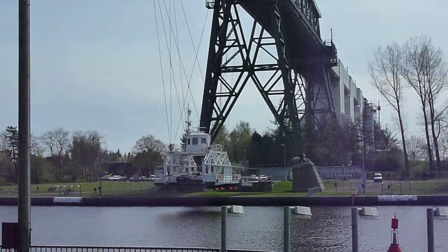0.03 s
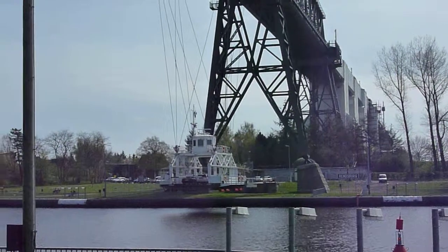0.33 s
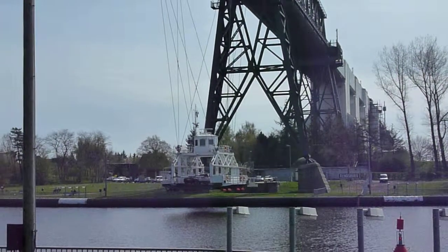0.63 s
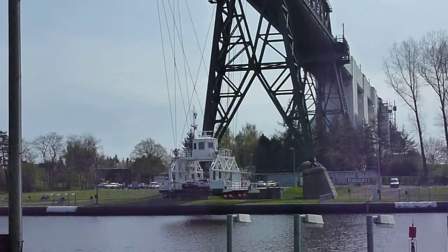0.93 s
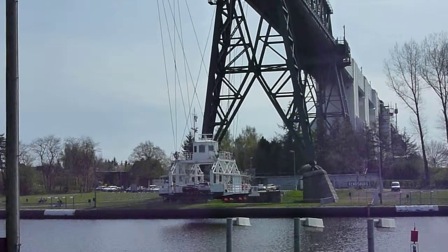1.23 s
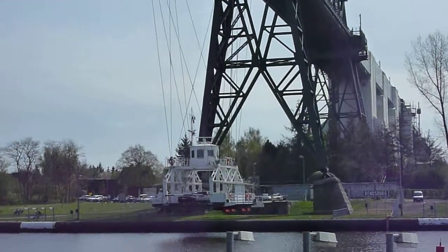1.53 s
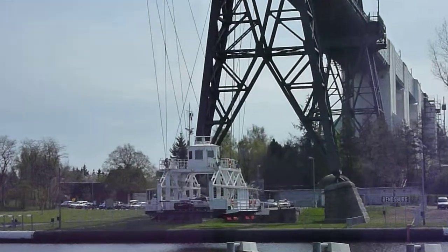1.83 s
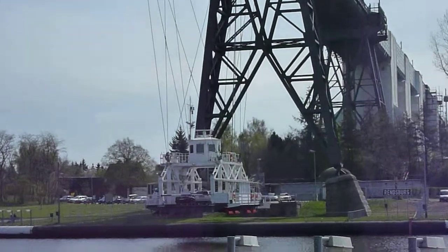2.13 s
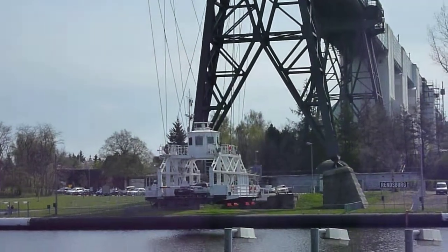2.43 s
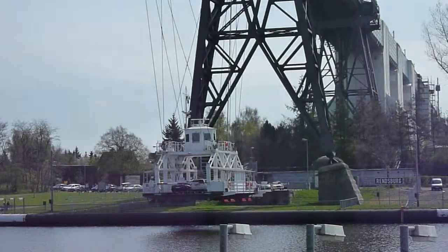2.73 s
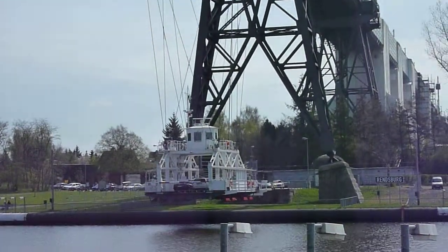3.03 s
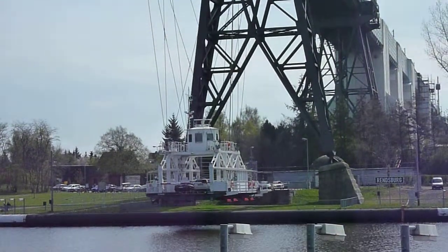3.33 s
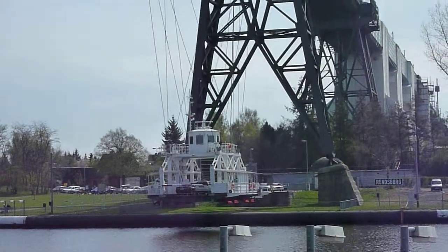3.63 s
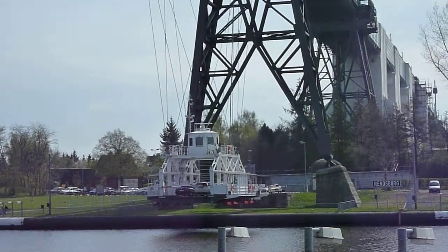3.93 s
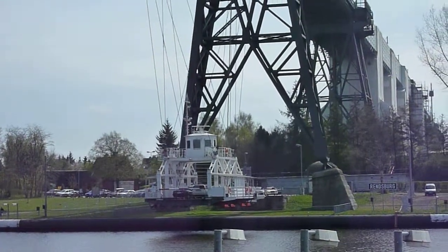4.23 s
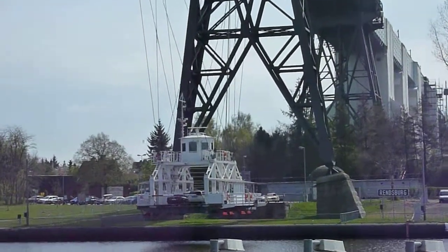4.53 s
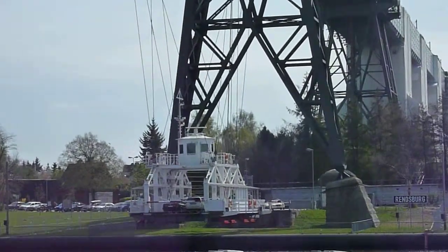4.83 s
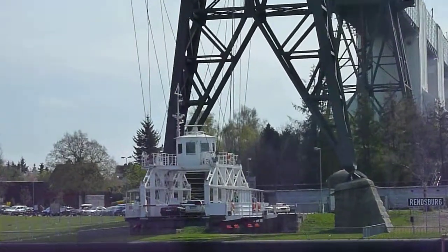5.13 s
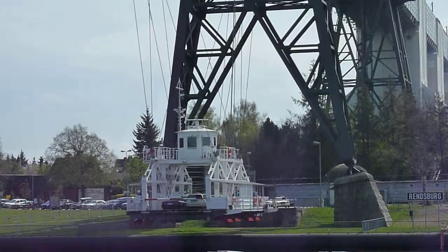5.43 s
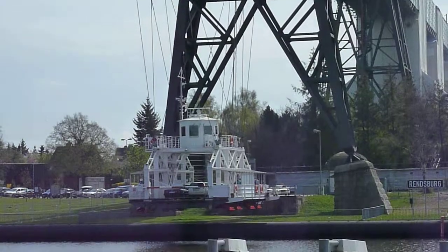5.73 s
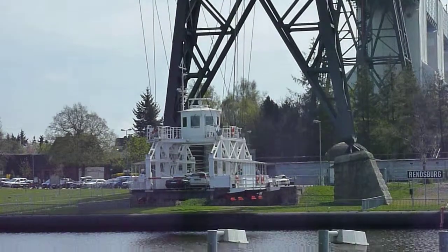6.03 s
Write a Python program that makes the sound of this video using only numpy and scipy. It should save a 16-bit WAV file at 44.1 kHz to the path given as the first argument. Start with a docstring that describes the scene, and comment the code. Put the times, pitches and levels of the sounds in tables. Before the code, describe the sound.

A pile driver strikes steel across a canal, heard from a distance in the open air. Eight clangs fall evenly, about 0.73 seconds apart, from 0.4 to 5.6 seconds, loudest around the middle. Each has a mid-pitched, wavering metallic ring and a clatter of echoes that fades towards the next blow. A low, steady hum of far traffic lies underneath. Wind rumbles on the microphone, lightly at first, with more frequent puffs from about 2.4 seconds and the strongest buffeting between 5 and 6 seconds. The hand-held camera makes a few tiny, close clicks in the first second, then sharper ones at about 1.7 and 4.8 seconds. A bird gives a single faint, thin peep at about 1.1 seconds. From about 3.6 seconds the camera's zoom motor adds a quiet, high hiss, mostly on the left, lasting until the end at about 6 seconds.

```python
"""Steel clangs ring out over a low rumble, one every 0.73 s: a pile driver across a canal.
Each hammer blow makes the steel pile ring, and echoes from banks and buildings smear it.
Wind buffets the microphone and grows stronger towards the end, over a hum of far traffic.
Close by, a hand-held camera clicks a few times and its zoom motor starts to hiss. A bird peeps once."""
import sys
import numpy as np
from scipy import signal
from scipy.fft import rfft, irfft
from scipy.io import wavfile
from scipy.ndimage import uniform_filter1d

SR = 44100
rng = np.random.default_rng(int(sys.argv[2]) if len(sys.argv) > 2 else 0)


def materialize(psi):
    """Save the field psi as 16-bit PCM at rate SR to the path in sys.argv[1].

    A 1-D psi becomes a single channel; in a 2-D psi each row is a channel.
    """
    bounded = np.clip(np.atleast_2d(psi).T, -1, 1)
    quanta = np.round(bounded * 32767).astype(np.int16)
    wavfile.write(sys.argv[1], SR, quanta)


N = 268128
TIME = np.arange(N) / SR

# how much louder the blows are on the left: pitch_hz, left_minus_right_db
BLOW_PAN = [(400, 2.8), (900, 1.3), (1600, 4.4), (2750, 6.7), (5000, 9.2)]


def pile_driver(clatter_db=-14.0, ring_db=-23.5, fresh_db=-10, phase_wobble=0.2, strength_spread_db=2.0):
    """A hammer strikes steel. Every blow takes the same echo paths, so only a little is new each time."""
    # hammer blows: start_s, level_db
    blows = [(0.424, -5.5), (1.153, -4), (1.882, -3), (2.614, -1.15), (3.352, -0.9), (4.081, -1.7),
             (4.823, -3), (5.563, -3)]
    # tones of the steel pile: pitch_hz, relative_db, fade_s (time to fall by 60 dB)
    tones = [(309, -4.5, .9), (401, -7.5, 1.4), (449, -1, .7), (484, -5.5, .7), (534, -1, .7),
             (594, -2, .7), (831, -5, .55), (886, 0, .6), (935, 2, .6), (974, -6, .55), (1006, -2.5, .55),
             (1034, -2.5, .55), (1093, -1, .6), (1116, -4, .6), (1184, -8, .65), (1220, -6, .7),
             (1307, -6, .7), (1386, -3, .72), (1444, -7.5, .65), (1697, -9.5, .55), (1733, -11, .55),
             (1837, -12, .55), (2796, -21, .7), (3472, -26, .9), (3860, -35, 1.8), (4597, -23.5, .9),
             (5848, -25, .95), (6419, -31, .9), (6762, -41, .8), (7278, -33, 1)]
    t, out = TIME[:2 ** 16], np.zeros((2, N + 2 * SR))
    shared_clatter, *changes = clatter(t, count=len(blows) + 1)
    phases = rng.uniform(0, 2 * np.pi, len(tones))
    rings = np.array([from_db(ring_db + db) * pile_ring(t, hz, fade_s) for hz, db, fade_s in tones])
    ring_pan = panned(at_hz(BLOW_PAN, np.array(tones)[:, 0]))
    octaves = np.log2(np.clip(np.fft.rfftfreq(len(t), 1 / SR), 250, 8000) / 1000)
    mean_db = np.mean(blows, axis=0)[1]
    for (start_s, level_db), change in zip(blows, changes):
        turn, strength = rng.standard_normal((2, len(tones)))
        struck = from_db(strength_spread_db * strength) * np.exp(1j * (phases + phase_wobble * turn))
        ringing = ((ring_pan * struck) @ rings).real   # add up the tones on each side
        blow = from_db(clatter_db) * (shared_clatter + from_db(fresh_db) * change) + ringing
        tilt_db = 0.057 * (level_db - mean_db)   # per octave: harder blows are brighter
        start = round(start_s * SR)
        out[:, start:start + len(t)] += irfft(rfft(blow) * from_db(level_db + tilt_db * octaves))
    return out[:, :N]


def pile_ring(t, hz, fade_s, waver_depth=0.87, wavers_per_s=28):
    """One tone of the pile, as complex numbers. Its echoes overlap, so it wavers as it dies."""
    real, imaginary = rng.standard_normal((2, 200))
    waver = np.interp(t * wavers_per_s, np.arange(len(real)), real + 1j * imaginary) / np.sqrt(2)
    rise_s = 0.051 * (hz / 1000) ** 0.31   # high tones swell later
    return echo_envelope(t, rise_s, fade_s) * (1 + waver_depth * waver) * np.exp(2j * np.pi * hz * t)


def clatter(t, count, slap_rise_s=0.0011, slap_fall_s=0.0075, slap_top_hz=2200):
    """Several versions of a blow scattered into countless echoes; a few dull slaps stand out."""
    # tone colour of the clatter: pitch_hz, relative_db
    colour = [(190, -14), (300, -5.5), (420, 1), (600, 4.5), (700, -3.5), (830, 3), (1100, -0.5),
              (1400, -3), (1590, -10), (1850, -9.5), (2300, -16.5), (3200, -20), (5000, -28), (7500, -43)]
    # how alike left and right are: pitch_hz, likeness (1 or more means the same)
    likeness = [(300, 2), (1000, 0.9), (2000, 1.5), (3500, 0), (7000, 0.5)]
    # how long the echoes take to build up: pitch_hz, rise_s
    rises = [(300, 0.038), (1000, 0.068), (1900, 0.013), (3000, 0.032), (7000, 0.0087)]
    # how long the echoes last: pitch_hz, fade_s
    fades = [(250, 1), (600, 0.86), (1100, 0.64), (2200, 0.82), (4000, 0.63), (7500, 0.64)]
    # hard slaps back from walls and quays: delay_s, height (0-1, above the scattered sound)
    reflections = [(0.023, 0.9), (.031, 0.5), (0.048, 1), (0.069, 0.3), (.085, .9), (0.129, 0.5),
                   (0.157, 0.5)]
    spectra = rfft([stereo_noise(colour, likeness, size=len(t)) for _ in range(count)])
    octave = np.log2(np.fft.rfftfreq(len(t), 1 / SR) + 1)
    slaps = sum(height * np.exp(-abs(t - delay_s) / np.where(t < delay_s, slap_rise_s, slap_fall_s))
                for delay_s, height in reflections)
    out = 0
    for hz in 125 * 2 ** np.arange(0, 6.6, .5):   # bands half an octave apart
        band = irfft(spectra * np.maximum(1 - 2 * abs(octave - np.log2(hz)), 0), len(t))
        envelope = echo_envelope(t, at_hz(rises, hz), at_hz(fades, hz))
        envelope *= 1 + slaps / (1 + (hz / slap_top_hz) ** 2)
        out = out + band * (envelope * panned(at_hz(BLOW_PAN, hz)))
    return out


def echo_envelope(t, rise_s, fade_s, tail_db=-20, tail_fade_s=1.4):
    """Echoes pile up, then die away; the far bank adds a faint long tail."""
    build = 1 - np.exp(-t / rise_s)
    return build * np.hypot(from_db(-60 * t / fade_s), from_db(tail_db - 60 * t / tail_fade_s))


def wind(steady_db=3.5, swell_db=2.3, buffet_db=-1, flap_db=-2, gusty_db=-24):
    """Swirls of air hit each microphone opening separately; stronger wind makes smaller, brighter ones."""
    # strength of the breeze: time_s, relative_db
    strength = [(0.0, -32), (0.32, -38.5), (1.03, -32.5), (2.18, -40), (3.27, -36), (3.42, -40),
                (4.35, -34.5), (4.64, -38), (5.0, -27), (5.33, -26), (5.59, -26), (5.79, -23.5),
                (5.96, -29), (6.08, -36.5)]
    # the breeze swings round to the left: time_s, left_minus_right_db
    side = [(0, -1), (.6, 0.5), (1.6, 4), (6.08, 5)]
    # single shoves of air: peak_s, relative_db, width_s
    buffets = [(.15, -28.5, 0.038), (.985, -25, 0.028), (1.25, -31.5, 0.06), (1.78, -36.5, 0.081),
               (2.385, -24.5, 0.037), (2.81, -22, 0.012), (3.0, -21.5, 0.023), (3.215, -22.5, 0.0088),
               (3.68, -29, 0.023), (3.86, -22.5, 0.027), (4.23, -20, 0.029), (4.87, -19.5, 0.037),
               (5.195, -14.5, 0.0063), (5.29, -16.5, 0.0077), (5.475, -14.5, 0.015), (5.62, -17.5, 0.033),
               (5.79, -21, 0.021), (5.9, -21.5, .018)]
    # brief, brighter flaps of air: peak_s, relative_db, width_s
    flaps = [(3.742, -28, .002), (5.487, -26, 0.00177), (5.497, -15, 0.0023)]
    # tone colours of light wind, gusts and flaps: pitch_hz, relative_db
    light_colour = [(20, -10), (35, -7), (60, 0.5), (100, 2.5), (160, -2.5), (240, -8.5), (350, -20),
                    (600, -24), (1200, -47.5), (3000, -60.5)]
    gust_colour = [(20, -17.5), (40, -7), (65, 0.5), (110, -1.5), (170, 2), (260, -5), (380, -10.5),
                   (600, -19.5), (1200, -37), (3000, -61.5)]
    flap_colour = [(200, -4), (600, 13), (1100, 4), (1700, -5), (2400, -36), (4000, -56)]
    breeze = from_db(in_time(strength) + steady_db + swell_db * swells(per_s=17)) * panned(in_time(side))
    flow = np.hypot(breeze, from_db(buffet_db) * puffs(buffets) * panned(pan_db=7.5))
    gust_share = flow ** 2 / (flow ** 2 + from_db(gusty_db) ** 2)
    light = np.sqrt(1 - gust_share) * swirls(light_colour, likeness=0.082)
    gusts = np.sqrt(gust_share) * swirls(gust_colour, likeness=0.054)
    flapping = from_db(flap_db) * puffs(flaps) * stereo_noise(flap_colour, likeness=0.26)
    return flow * (light + gusts) + flapping * panned(pan_db=-3.0)


def swirls(colour, likeness, window_s=0.081):
    """The rumble of churning air, evened out so that the wind's strength sets its level."""
    noise = stereo_noise(colour, likeness)
    power = uniform_filter1d(noise ** 2, round(window_s * SR), axis=1)
    return rms_one(noise / np.sqrt(power + 1e-9))


def puffs(rows):
    """The bell-shaped rise and fall of short puffs of air."""
    return sum(from_db(db) * np.exp(-.5 * ((TIME - peak_s) / width_s) ** 2) for peak_s, db, width_s in rows)


def swells(per_s):
    """A random rise and fall, separate for left and right."""
    sides = rng.standard_normal((2, 400))
    return np.array([np.interp(TIME * per_s, np.arange(len(points)), points) for points in sides])


def camera_clicks(grit_db=-17, grit_s=0.0022, opposed=0.82, opposed_hz=2500):
    """Plastic parts slip and ring the case; its higher tones shake the two microphones opposite ways."""
    # snaps of the case: start_s, relative_db, brightness_db_per_octave
    clicks = [(0.1765, -23.5, 3), (.339, -27, -8), (0.586, -11, -3), (0.9245, -22.5, -11.5),
              (1.6796, -2, 8), (1.6812, 2, -3.5), (4.7771, -3.5, -3.5), (4.7947, -6, 3), (4.796, -4, -0.5)]
    # tones of the case: pitch_hz, relative_db, fade_s
    tones = [(1320, -27, 0.0056), (2656, -13, 0.011), (2990, -13.5, 0.0052), (3600, -12.5, 0.0048),
             (4100, -17, 0.0048), (4940, -7, 0.002), (5850, -14, 0.003), (6970, -14, 0.003)]
    out, t = 0, TIME[:SR // 50]
    for hz, tone_db, fade_s in tones:
        force, octave = np.zeros(N), np.log2(hz / 4000)
        for start_s, db, tilt_db in clicks:
            slip = from_db(grit_db) * rng.standard_normal(len(t)) * np.exp(-t / grit_s)
            slip[0] = rng.choice([-1, 1])   # a sharp snap ahead of the gritty tail
            start = round(start_s * SR)
            force[start:start + len(t)] += from_db(db + tilt_db * octave) * slip
        decay, turn = from_db(-60 / (fade_s * SR)), 2 * np.pi * hz / SR   # per sample
        ring = from_db(tone_db) * signal.lfilter([1], [1, -decay * np.exp(1j * turn)], force + 1e-18)
        left_lag = np.pi * opposed * min(hz / opposed_hz, 1)
        out = out + np.array([(ring * np.exp(-1j * left_lag)).imag, ring.imag])
    return out * panned(pan_db=-2)


def zoom_motor():
    """The camera's small motor starts a thin hiss a little past halfway."""
    # tone colour of the hiss: pitch_hz, relative_db
    colour = [(1500, -19.5), (2600, 9), (4000, -5.5), (4600, 0.5), (5000, 8.5), (5500, -1.5), (6300, 6),
              (7000, 0), (8000, -16)]
    # loudness of the motor: time_s, level_db
    loudness = [(0, -71.5), (3.58, -78.5), (3.66, -55.5), (4.6, -57.5), (6.08, -55.5)]
    return from_db(in_time(loudness)) * stereo_noise(colour, likeness=0.086) * panned(pan_db=10.5)


def bird(start_s=1.064, end_s=1.12, pitch_hz=2230, arch_hz=35, level_db=-43, echo_db=-12, echo_s=0.0177):
    """One thin peep that rises and falls slightly in pitch, and its echo."""
    progress = np.clip((TIME - start_s) / (end_s - start_s), 0, 1)
    arch = np.abs(np.sin(np.pi * progress))
    peep = np.sqrt(arch) * np.sin(2 * np.pi * np.cumsum(pitch_hz + arch_hz * (arch - 1)) / SR)
    echo = from_db(echo_db) * np.interp(TIME - echo_s, TIME, peep)
    return from_db(level_db) * (peep + echo) * panned(pan_db=3)


def far_traffic():
    """Distant traffic blends into a low, nearly steady hum."""
    # tone colour of the hum: pitch_hz, relative_db
    colour = [(40, 7), (150, 1.5), (400, 1), (700, -6.5), (1100, -8), (1600, -15.5), (2500, -20.5),
              (4000, -26), (6000, -34), (8000, -39.5)]
    # how alike left and right are: pitch_hz, likeness (0-1)
    likeness = [(100, 0.94), (500, 1), (1000, 0.93), (2000, 0.63), (4000, 0.0039), (8000, 0)]
    # loudness of the hum: time_s, level_db
    loudness = [(0, -40), (2, -38), (4, -38.5), (6.08, -37.5)]
    return from_db(in_time(loudness)) * stereo_noise(colour, likeness) * panned(pan_db=1.5)


def stereo_noise(colour, likeness, size=N):
    """Noise with a given tone colour and left-right likeness (a table or one value)."""
    hz = np.arange(size // 2 + 1) * SR / size
    alike = np.clip(at_hz(likeness, hz) if np.ndim(likeness) else likeness, -1, 1)
    mid, side = rfft(rng.standard_normal((2, size)))
    pair = np.sqrt(1 + alike) * mid + np.sqrt(1 - alike) * side * [[1], [-1]]
    edge_fade = 1 / np.sqrt((1 + (colour[0][0] / (hz + 1)) ** 6) * (1 + (hz / colour[-1][0]) ** 6))
    return rms_one(irfft(pair * edge_fade * from_db(at_hz(colour, hz)), size))


def from_db(db):
    """Turn decibels into a gain."""
    return 10 ** (np.asarray(db) / 20)


def rms_one(x):
    """Scale a sound to an average (rms) level of 1."""
    return x / np.sqrt(np.mean(x ** 2) + 1e-20)


def in_time(rows):
    """Read a table of times and values at every sample."""
    return np.interp(TIME, *np.transpose(rows))


def at_hz(rows, hz):
    """Read a table at any pitch, with octaves evenly spaced."""
    pitches, values = np.transpose(rows)
    return np.interp(np.log(hz + 1e-9), np.log(pitches), values)


def panned(pan_db):
    """Left and right gains; above 0 dB the left is louder."""
    return from_db(np.array([[.5], [-.5]]) * pan_db)


def scene():
    """The pile driver over wind and traffic, with a bird and the camera's own noises."""
    background = far_traffic() + zoom_motor()
    return pile_driver() + wind() + camera_clicks() + bird() + background


def record(dry, notch_hz=5440, peak_limit=0.8, cutoff_hz=7700):
    """The camera drops a narrow slice of treble, rounds the highest peaks and cuts the top steeply."""
    notched = signal.lfilter(*signal.iirnotch(notch_hz, Q=16, fs=SR), dry)
    rounded = notched / (1 + (notched / peak_limit) ** 6) ** (1 / 6)
    return signal.sosfilt(signal.butter(18, cutoff_hz, fs=SR, output="sos"), rounded)


dry = scene()
out = record(dry)
materialize(out)
```